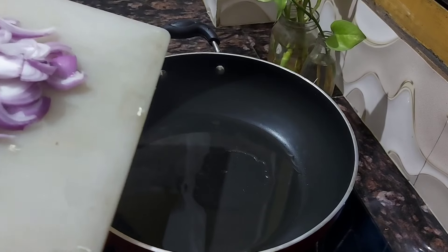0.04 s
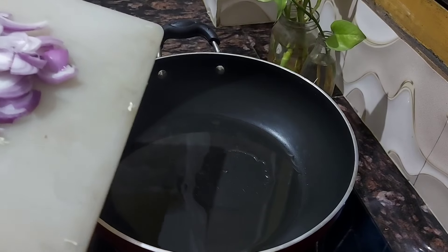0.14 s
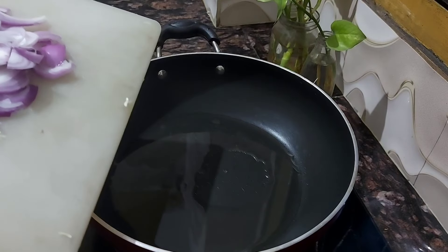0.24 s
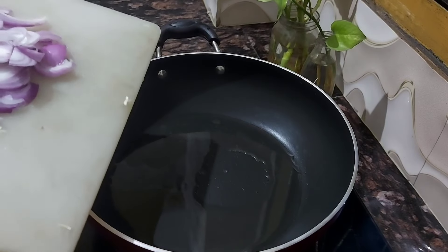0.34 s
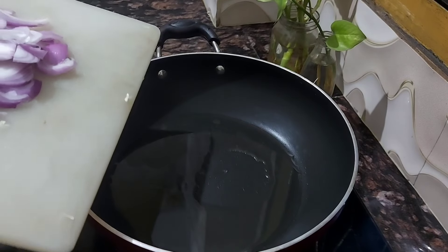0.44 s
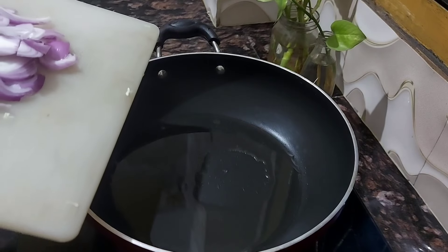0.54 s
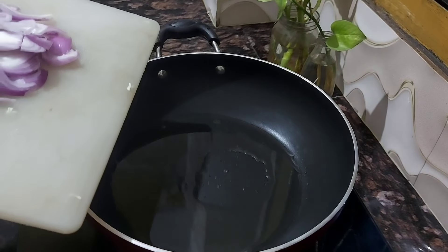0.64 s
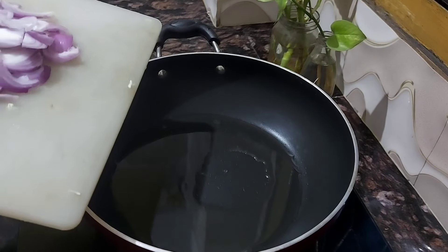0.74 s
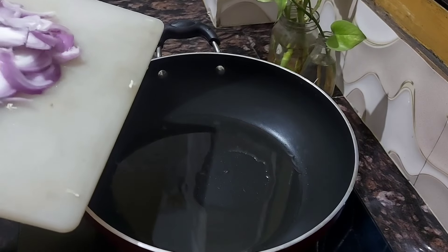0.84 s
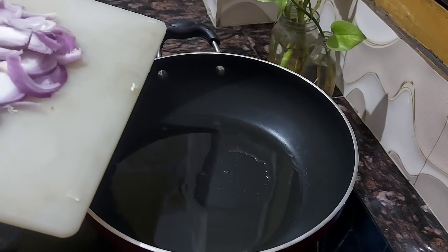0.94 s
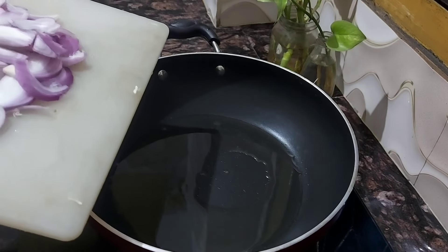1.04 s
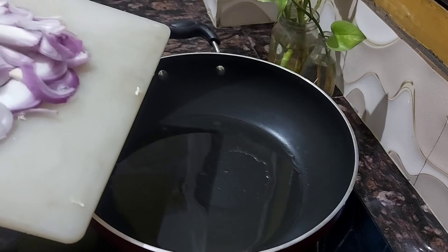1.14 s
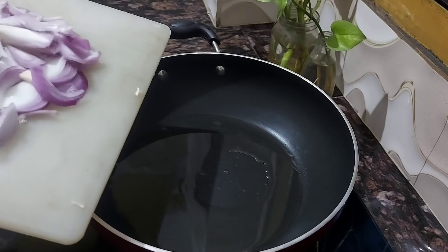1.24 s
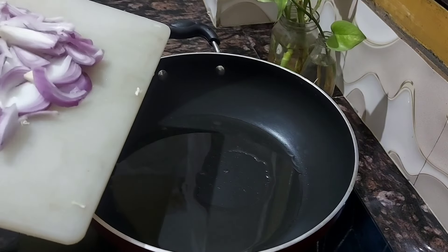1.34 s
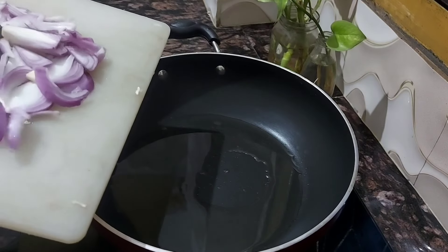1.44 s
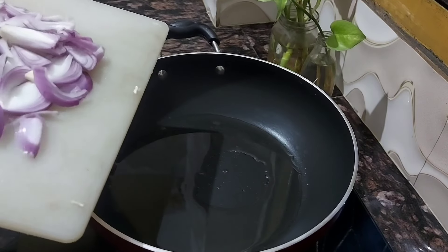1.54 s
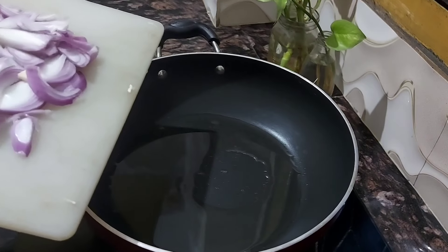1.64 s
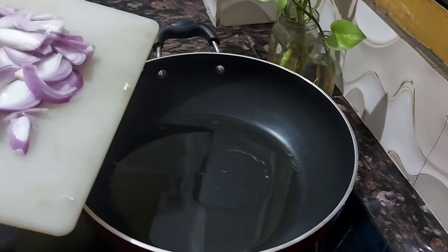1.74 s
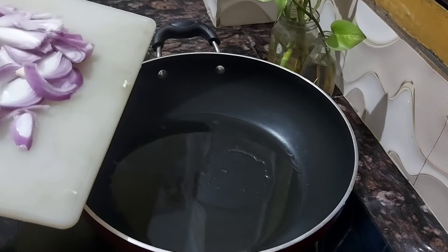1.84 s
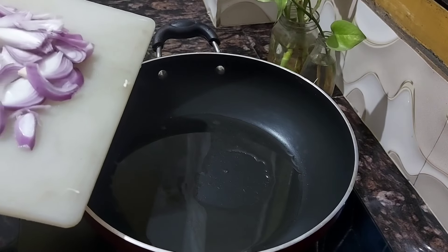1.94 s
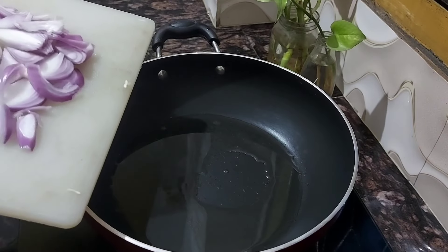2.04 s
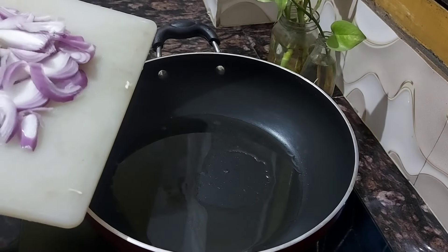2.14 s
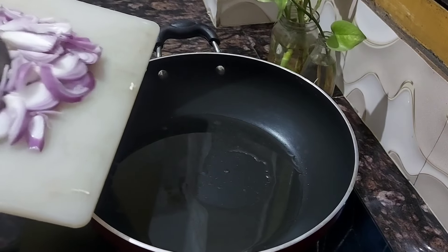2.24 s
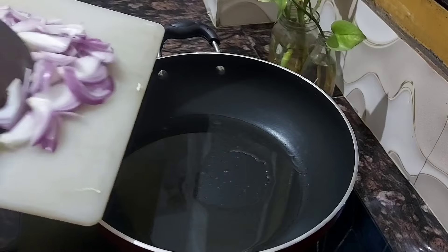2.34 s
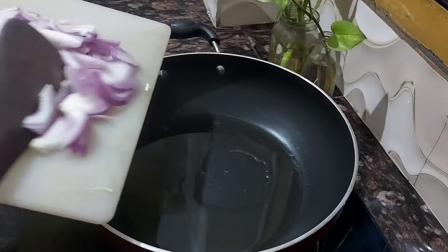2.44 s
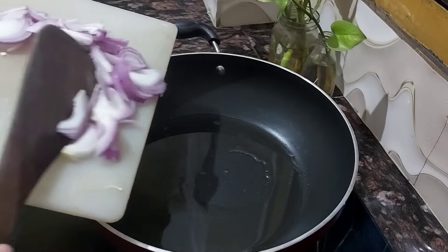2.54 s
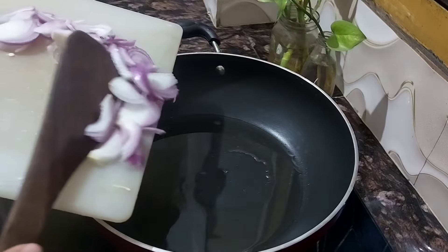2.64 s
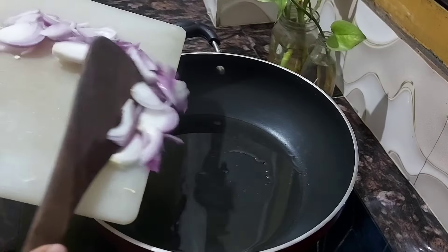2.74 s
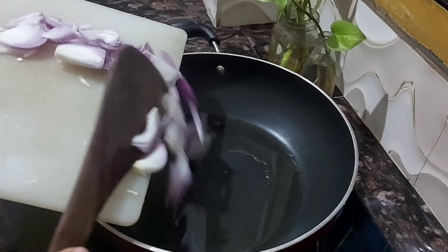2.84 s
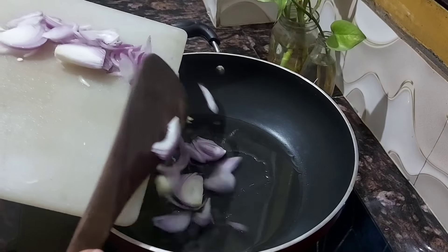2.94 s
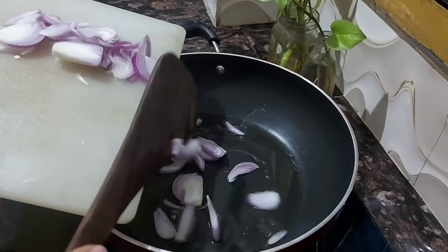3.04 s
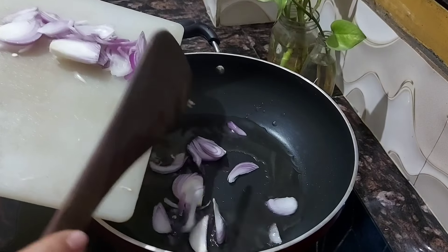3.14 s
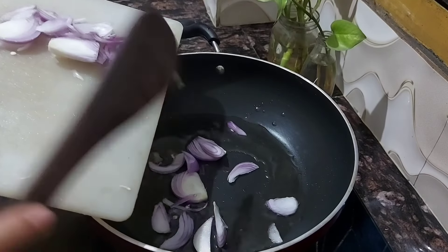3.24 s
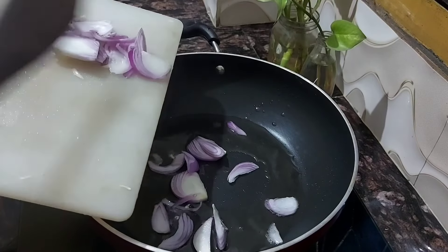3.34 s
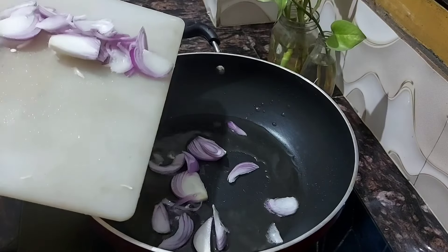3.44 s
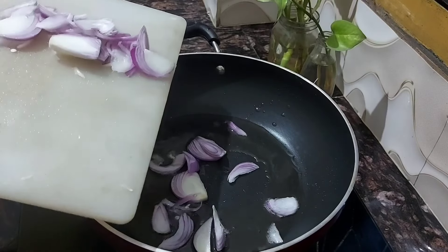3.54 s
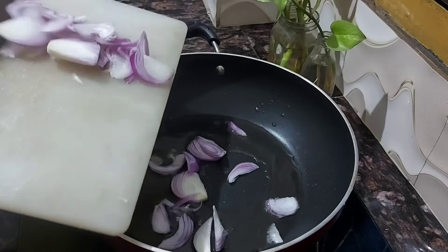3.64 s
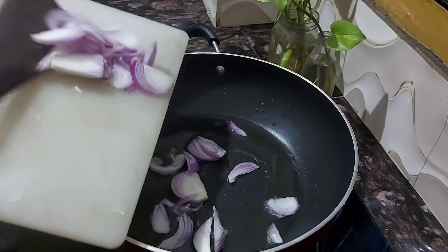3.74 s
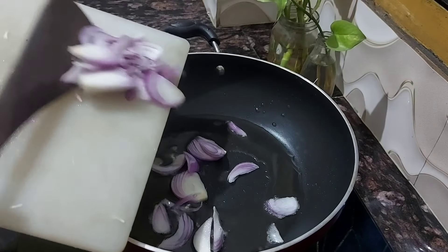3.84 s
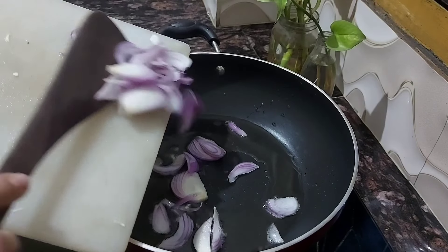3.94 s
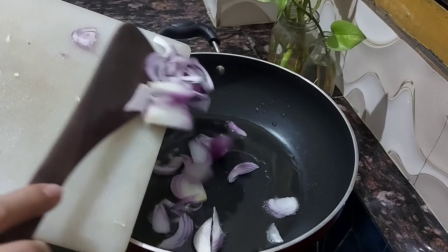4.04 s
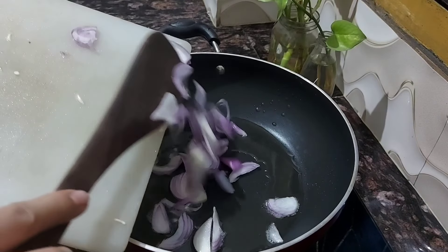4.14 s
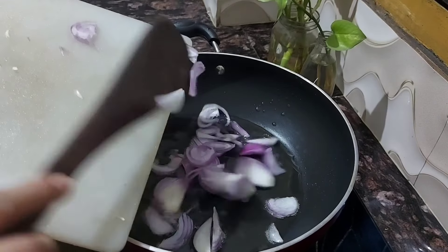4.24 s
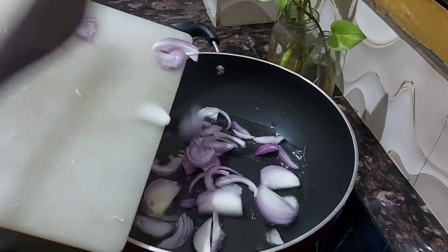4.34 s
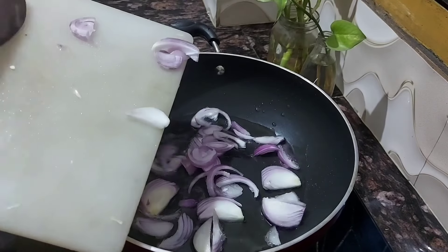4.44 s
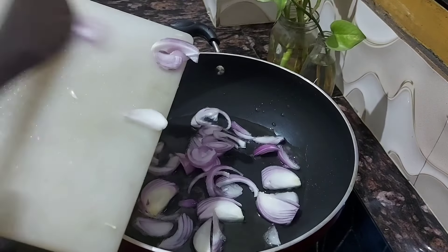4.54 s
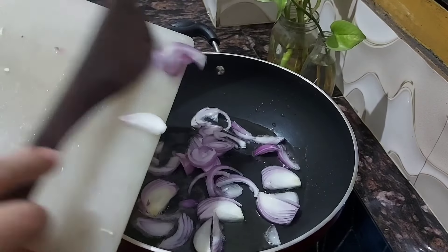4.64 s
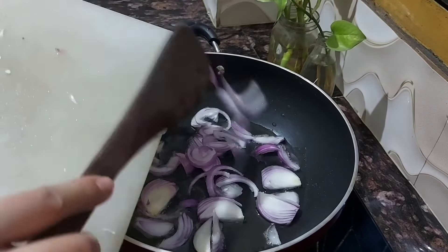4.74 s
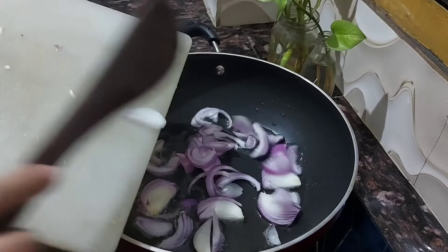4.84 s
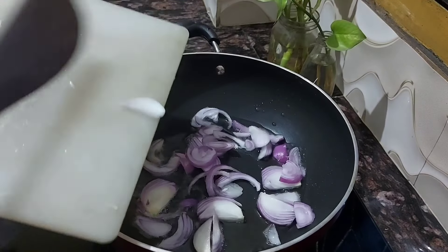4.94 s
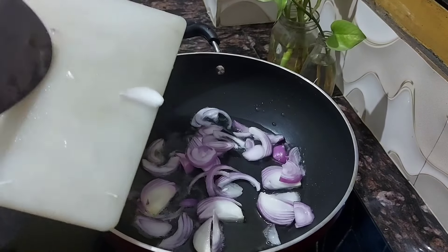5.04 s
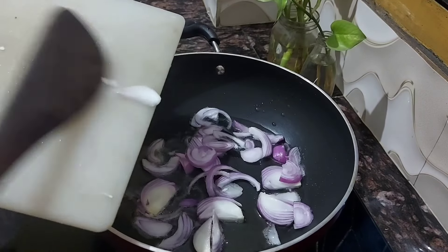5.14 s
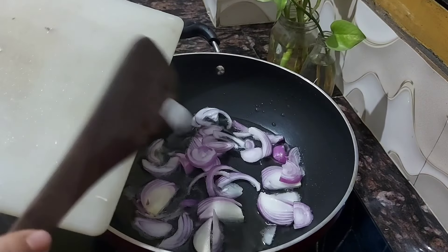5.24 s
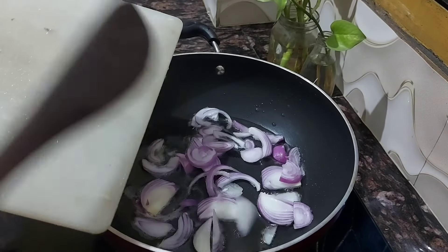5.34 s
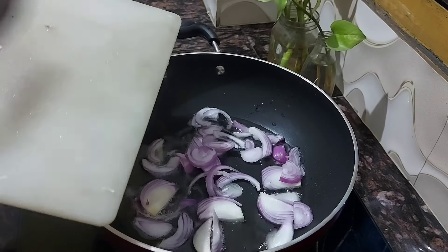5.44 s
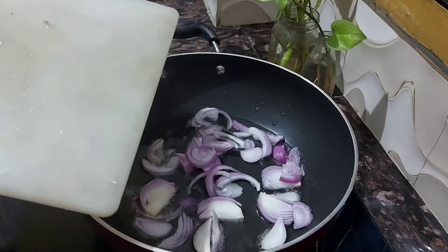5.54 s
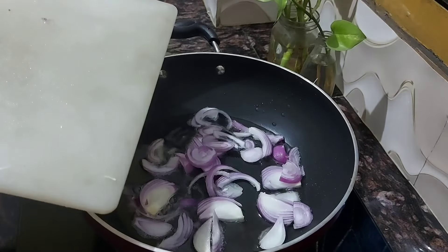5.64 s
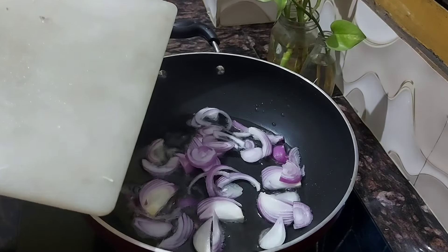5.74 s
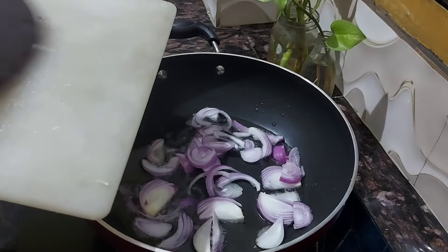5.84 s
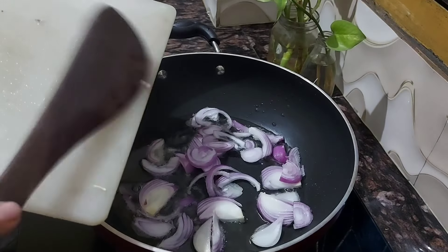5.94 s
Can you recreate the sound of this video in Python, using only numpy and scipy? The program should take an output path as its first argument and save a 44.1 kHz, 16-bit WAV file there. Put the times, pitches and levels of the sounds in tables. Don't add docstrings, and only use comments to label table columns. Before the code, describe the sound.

In a small home kitchen, faint hiss, mains buzz and low handling rumble accompany a tap and rough scrape on a plastic board. After a quiet pause and another faint push, onion slices fall into hot oil. Sizzle erupts abruptly, with crackles, foamy surges and loud late pops. A close stereo counter microphone sounds dull on top.

```python
import sys
import numpy as np
from scipy import signal
from scipy.fft import rfft, irfft, next_fast_len
from scipy.io import wavfile
from scipy.ndimage import uniform_filter1d

SR = 44100
rng = np.random.default_rng(int(sys.argv[2]) if len(sys.argv) > 2 else 0)


def volts(x):
    e = np.asarray(x, float) / 20
    return 10 ** e


def to_wav(sig):
    pcm = np.clip(np.atleast_2d(sig), -1, 1) * 32767
    pcm = np.round(pcm).astype(np.int16)
    wavfile.write(sys.argv[1], SR, pcm.T)


N = 264159

# [t/s, peak level/dB, small bubble f/Hz, its level/dB, crack level/dB]
DEEP_POPS = [
    (3.066, -27.5, 5450, 7, -1),
    (3.262, -29, 3640, 10.5, 0),
    (3.804, -53, 2920, 26, -15),
    (4.585, -27, 3030, -3, -18),
    (5.146, -10.5, 1820, -11, -13.5),
    (5.359, -19.5, 5230, 1.5, 6.5),
    (5.7931, -10, 1370, -11.5, -10.5),
    (5.9248, -12, 1140, -1, -2.5),
]


def rms_one(x):
    return x / np.sqrt(np.mean(x ** 2) + 1e-20)


def in_time(rows):
    s, *columns = np.transpose(rows)
    return [np.interp(np.arange(N) / SR, s, c) for c in columns]


def at_hz(points, hz):
    points_hz, points_db = np.transpose(points)
    return np.interp(np.log(hz), np.log(points_hz), points_db)


def drift(rate_hz):
    r = np.exp(-80 * np.pi * rate_hz / SR)
    slow = signal.lfilter([1], [1, -2 * r, r * r], rng.standard_normal(N // 40 + 2002))[2000:]
    return np.interp(np.arange(N) / 40, np.arange(len(slow)), rms_one(slow))


def resonate(x, hz, width_hz):
    r = np.exp(-np.pi * width_hz / SR)
    w = 2 * np.pi * hz / SR
    return signal.lfilter([0, np.sin(w)], [1, -2 * r * np.cos(w), r * r], x + 1e-18)


def grains(per_s, spread_db):
    shape = (2, 2, N)
    sizes = volts(spread_db * np.minimum(rng.exponential(1, shape), 5))
    signs = rng.choice([-1, 1], shape)
    struck = rng.random(shape) < per_s / SR
    return rms_one(sizes * signs * struck) + 1e-9


def banded(trains, spectrum, patchy_db, alike_more=0.0):
    # [f/Hz, correlation]
    likeness = [(60, -1.4), (210, 0.84), (750, 0.52), (2640, 0.35), (9340, 0.41)]
    out, together = 0, drift(10.0)
    low_hz, high_hz = spectrum[0][0], spectrum[-1][0]
    edges = np.geomspace(low_hz, high_hz, int(2.5 * np.log2(high_hz / low_hz)) + 2)
    for k, (low, high) in enumerate(zip(edges, edges[1:])):
        band = signal.butter(2, [low, high], "band", fs=SR, output="sos")
        mid, side = signal.sosfilt(band, trains[k % 2])
        hz = np.sqrt(low * high)
        alike = np.clip(at_hz(likeness, max(hz, 130)) + alike_more, -.99, .99)
        gain = volts(at_hz(spectrum, hz) + patchy_db * (together + drift(22.5)))
        out = out + gain * (np.sqrt(1 + alike) * mid + np.sqrt(1 - alike) * side * [[1], [-1]])
    return rms_one(out)


def swells(rows, bed_db=-120):
    t, power = np.arange(N) / SR, volts(bed_db) ** 2
    for s, db, rise, hold, fall in rows:
        climb_db = 30 * np.maximum(s - t, 0) / rise
        fall_db = fall * np.maximum(t - s - hold, 0)
        power = power + volts(db - climb_db - fall_db) ** 2
    return np.sqrt(power)


def still_kitchen():
    # [f/Hz, level/dB per Hz]
    hiss_spectrum = [(50, -11), (120, -0.5), (300, -6.5), (600, -8.5), (1300, -12.5), (3000, -15),
                     (6000, -17.5), (11000, -31)]
    # [f/Hz, level/dB per Hz]
    rumble_spectrum = [(18, 9.5), (35, -9.5), (55, -8.5), (90, -11), (160, -17.5)]
    # [f/Hz, level/dB]
    harmonics = [(102.3, -74), (247.6, -76), (301.5, -76), (349.9, -85), (452.2, -80.5), (500.6, -77),
                 (597.5, -83.5), (672.9, -87.5), (699.8, -78.5), (802.1, -85), (1001, -81), (1098, -83.5),
                 (1200, -85.5), (1249, -82.5), (1400, -88), (1599, -85.5), (1798, -89.5), (2223, -90),
                 (2299, -84), (2498, -102.5), (2826, -103), (2998, -88)]
    # [t/s, depth/dB]
    ducks = [
        (0, 7.5),
        (.635, 9.5),
    ]
    # [t/s, level/dB, hold/s, fall/dB per s]
    shifts = [
        (0, -61, 0.25, 33),
        (1.55, -75, .01, 46),
        (2.1, -49.5, .05, 10.5),
        (3.17, -48.5, 0.072, 64),
        (3.5, -57.5, 0.37, 83),
        (4.035, -55, .02, 30.5),
        (4.34, -50.5, .02, 17),
        (5.79, -58, .2, 34),
    ]
    duck_s, recover_s = 0.019, 0.075
    rise_s, counter_db = 0.22, -66
    t = np.arange(N) / SR
    hiss_db = -72.5
    for s, db in ducks:
        hiss_db = hiss_db - db * np.exp(-np.maximum((t - s) / recover_s, (s - t) / duck_s))
    hands = swells([(s, db, rise_s, hold, fall) for s, db, hold, fall in shifts], counter_db)
    hiss = banded(rng.standard_normal((2, 2, N)), hiss_spectrum, patchy_db=.15, alike_more=.3)
    mains = 2 * np.pi * 50 * t
    buzz = 0
    for hz, db in harmonics:
        buzz = buzz + volts(db + drift(1.5)) * np.sin(round(hz / 50) * mains + rng.uniform(0, 5.55))
    rumble = banded(rng.standard_normal((2, 2, N)), rumble_spectrum, patchy_db=3.5, alike_more=-0.27)
    rumble = rumble + 0.52 * np.sin(mains)
    left_leaning = buzz * volts(hiss_db + 75.5) + hands * rumble
    return volts(hiss_db + 8) * hiss + left_leaning * volts([[2.5], [-2.5]])


def board():
    # [f/Hz, level/dB per Hz]
    scrape_spectrum = [(60, 12.5), (150, 3), (450, 8.5), (900, 3), (1700, 0.5), (3000, -6), (5000, -13),
                       (11000, -39)]
    # [t/s, peak level/dB]
    tap_event = [
        (0.1225, -28),
    ]
    # [t/s, level/dB, rise/s, hold/s, fall/dB per s]
    strokes = [
        (0.12, -46, 0.0024, 0.024, 51),
        (0.198, -51, 0.16, .12, 150),
        (.42, -77, 0.056, 0.13, 300),
        (2.072, -55.5, 0.073, .09, 115),
    ]
    edge_db, edge_sag_db_per_s = 0.5, 51
    t = np.arange(N) / SR
    body, edge = swells(strokes), 0
    for row in strokes:
        edge = edge + swells([row]) * volts(edge_db - edge_sag_db_per_s * np.maximum(t - row[0], 0))
    slide = banded(grains(3500, spread_db=1.5), scrape_spectrum, patchy_db=.6, alike_more=0.12)
    low = signal.sosfilt(signal.butter(2, 1400, "low", fs=SR, output="sos"), slide)
    high = signal.sosfilt(signal.butter(2, 1400, "high", fs=SR, output="sos"), slide)
    out = volts(-1.4) * body * rms_one(low) - volts(-1.7) * edge * rms_one(high)
    s, db = tap_event[0]
    t = np.arange(300) / SR
    tap = rng.standard_normal(300) * np.exp(-t / .0011) * np.minimum(t / .001, 1)
    tap = signal.sosfilt(signal.butter(2, [400, 5500], "band", fs=SR, output="sos"), tap)
    at = round(s * SR)
    out[:, at:at + 300] += volts(db + 7.5) * tap
    return out


def pops():
    # [t/s, peak level/dB, small bubble f/Hz, its level/dB, crack level/dB]
    shallow_pops = [(3.229, -34.5, 5550, -5, 3), (3.39, -27, 4300, -1, -4), (3.457, -30.5, 4720, 6, 7.5),
                    (3.494, -23, 6000, -6, -10), (3.577, -24.5, 3740, -1, 1),
                    (3.625, -24.5, 2170, -3, -2.5), (3.6701, -14, 3025, 5, -6), (3.694, -37, 2880, 5, -7),
                    (3.891, -30, 2210, 7, -3), (4.664, -22, 1900, -9, -6), (4.734, -22, 1840, -7, -2),
                    (5.022, -29, 3970, -30, 12), (5.631, -32.5, 2170, 0, 8)]
    deep_hz, shallow_hz = 766, 1470
    out, size = np.zeros((2, N)), 1400
    t = np.arange(size) / SR
    no_thump = signal.butter(2, 450, "high", fs=SR, output="sos")
    rows = [(*pop, deep_hz) for pop in DEEP_POPS] + [(*pop, shallow_hz) for pop in shallow_pops]
    for s, db, small_hz, small_db, crack_db, big_hz in sorted(rows):
        swell = np.minimum(t / .0017, 1) ** 2
        big = np.sin(2 * np.pi * big_hz * t) * np.exp(-t / 0.0021)
        small = volts(small_db) * np.sin(2 * np.pi * small_hz * t) * np.exp(-t / 0.0019 + .5)
        common, own = rng.standard_normal(size), rng.standard_normal((2, size))
        late = np.maximum(t - .0005, 0)
        snap = np.sin(2 * np.pi * (500 * late + 3e6 * late ** 2))
        snap = snap * (.4 + late / .001) * np.exp(-(late / .0013) ** 4)
        spray = .5 * (common + .4 * own) * np.exp(-t / .0012)
        at = round(s * SR)
        burst = volts(db) * (swell * (big + small) + volts(crack_db) * (snap + swell * spray))
        out[:, at:at + size] += signal.sosfilt(no_thump, burst)[:, :N - at]
    return out


def kitchen(x):
    t60_s, wall_cut_hz = 0.65, 5900
    size = next_fast_len(N + SR)
    w = 2 * np.pi * np.arange(size // 2 + 1) / size
    dull = 1 / (1 + 1j * w * SR / (2 * np.pi * wall_cut_hz))
    walls = np.zeros((2, len(w)), complex)
    for k, lag_s in enumerate(rng.uniform(.009, 0.031, 16)):
        loop = volts(-60 * lag_s / t60_s) * dull ** 0.2 * np.exp(-1j * w * round(lag_s * SR))
        walls[k % 2] += (-1) ** (k // 2) * loop / (1 - loop)
    return irfft(rfft(x, size) * walls, size)[:, :N]


def vigour():
    # [t/s, fizz level/dB, foam level/dB]
    boil = [(3.068, -61.5, -61), (3.2, -47, -48.5), (3.3, -45.5, -47.5), (3.4, -38.5, -49.5),
            (3.48, -38.5, -49.5), (3.59, -46.5, -57), (3.67, -42, -56), (3.74, -42, -49), (3.82, -39, -41),
            (3.95, -44, -49.5), (4.02, -40.5, -45.5), (4.28, -42.5, -48.5), (4.42, -41, -45.5),
            (5.06, -40, -49.5), (5.3, -42.5, -42), (5.55, -38.5, -51), (5.66, -42, -55.5), (5.99, -43, -57)]
    # [t/s, foam level/dB, churn level/dB, hold/s, fall/dB per s]
    surges = [(3.076, -43, -45, .01, 79), (3.25, -47, -64, 0.015, 150), (3.798, -40.5, -46.5, 0.023, 205),
              (3.902, -44.5, -51, 0.009, 120), (4.304, -47, -40.5, 0.07, 402), (4.588, -42, -42, .005, 209),
              (4.662, -37, -41, 0.036, 105), (4.713, -37.5, -59, 0.052, 111),
              (4.778, -37.5, -42, 0.039, 63), (5.143, -36, -40, 0.026, 79),
              (5.275, -40.5, -43.5, 0.088, 115), (5.797, -36, -40.5, 0.023, 32),
              (5.929, -36, -44, .05, 302)]
    # [t/s, level/dB, fall/dB per s]
    spits = [(3.07, -45, 100), (3.265, -46, 196), (3.626, -41, 65), (3.7, -44.5, 103), (4.19, -43.5, 100),
             (4.3, -39.5, 152), (4.369, -40.5, 400), (4.46, -39, 43), (5.128, -37.5, 504),
             (5.29, -38.5, 95), (5.362, -39.5, 102), (5.61, -39, 209), (5.799, -39, 26.5)]
    # [t/s, level/dB, fall/dB per s]
    wall_hits = [(3.066, -25, 897), (3.08, -44, 57), (3.47, -44, 42), (3.583, -40, 904), (3.632, -35, 405),
                 (3.677, -31, 600), (3.735, -38, 252), (3.805, -40.5, 150), (3.851, -32.5, 352),
                 (3.9, -41.5, 146), (4.3, -44, 30), (4.378, -38, 500), (4.79, -37, 104), (5.147, -30, 900),
                 (5.801, -46, 61), (5.931, -39, 554), (5.971, -36, 700)]
    surge_rise_s, spit_rise_s, wall_rise_s = .005, .011, .01
    splash_db, splash_fall_db_per_s = 3, 600
    fizz_db, foam_db = in_time(boil)
    churn_db = -50 + 0.69 * (foam_db + 50)
    foam, churn = [], []
    for s, db, surge_churn_db, hold, fall in surges:
        foam.append((s, db, surge_rise_s, hold, fall))
        foam.append((s, db + splash_db, surge_rise_s, 0, splash_fall_db_per_s))
        churn.append((s, surge_churn_db, surge_rise_s, hold, fall))
    spray = [(s, db, spit_rise_s, 0, fall) for s, db, fall in spits]
    wall = [(s, db, wall_rise_s, 0, fall) for s, db, fall in wall_hits]
    return swells(spray, fizz_db), swells(foam, foam_db), swells(churn, churn_db), swells(wall, fizz_db - 8)


def sizzle():
    # [f/Hz, level/dB per Hz]
    fizz_spectrum = [(450, -31), (800, 5.5), (1100, -34), (1600, 1), (2200, -0.5), (3500, 1), (6000, 2.5),
                     (11000, -3)]
    # [f/Hz, level/dB per Hz]
    foam_spectrum = [(250, -30.5), (400, -9), (650, -1), (1000, -3), (1600, -4), (2300, -7.5), (3500, -17),
                     (6000, -48)]
    # [f/Hz, level/dB per Hz]
    churn_spectrum = [(25, -15.5), (60, -7.5), (130, -9.5), (310, -0.5), (450, -1), (800, -42.5)]
    fizzing, foaming, churning, ringing = vigour()
    fizz = banded(grains(5000, spread_db=2.0), fizz_spectrum, patchy_db=1.17)
    foam = banded(grains(3500, spread_db=2.5), foam_spectrum, patchy_db=.8)
    churn = banded(grains(900, spread_db=4.0), churn_spectrum, patchy_db=-0.7)
    taps = rng.standard_normal(N) + 0.43 * rng.standard_normal((2, N))
    wall = rms_one(resonate(resonate(taps, 1450, 74), 1380, 200))
    bubbles = volts(4.0) * fizzing * fizz + volts(0.5) * foaming * foam
    return bubbles + volts(-3.93) * churning * churn + volts(-4.5) * ringing * wall


def pockets():
    # [t/s, length/s, f/Hz, width/Hz, level/dB]
    jets = [(3.076, 0.15, 843, 13.7, -32.5), (3.063, 0.14, 1473, 37, -38.5),
            (3.052, 0.24, 5900, 1200, -42.5), (3.261, 0.034, 3620, 170, -39),
            (3.304, 0.18, 3600, 200, -45.5), (3.38, 0.045, 4700, 890, -34.5),
            (3.463, 0.047, 5660, 580, -38), (3.676, 0.049, 2990, 90, -43), (3.696, 0.1, 2400, 300, -40),
            (3.812, 0.11, 323, 20, -42.5), (4.3, 0.16, 156, 74, -45), (4.711, 0.15, 321, 20, -43.5),
            (4.721, 0.09, 2720, 1000, -40), (4.937, 0.019, 1340, 120, -39.5), (5.15, 0.11, 680, 140, -39.5),
            (5.2, 0.29, 314, 29, -48.5), (5.62, 0.14, 1367, 37, -48), (5.796, 0.036, 1900, 324, -31.5),
            (5.962, 0.022, 1290, 216, -32), (5.798, 0.059, 830, 170, -38.5),
            (4.759, 0.057, 1550, 500, -34.5)]
    out, t = np.zeros((2, N)), np.arange(12000) / SR
    for s, length_s, hz, width_hz, db in jets:
        jet = rng.standard_normal(16000) + 0.4 * rng.standard_normal((2, 16000))
        song = resonate(resonate(jet, hz, width_hz), hz, 3 * width_hz)[:, 4000:]
        loudness = uniform_filter1d(np.mean(song ** 2, axis=0), size=500)
        song = rms_one(song / (loudness + .05 * loudness.mean()) ** .3)
        shape = np.clip(t / 0.0015, 0, 1) * np.exp(-.7 * t / length_s) / (1 + (t / length_s) ** 7)
        at = round(s * SR)
        out[:, at:at + len(t)] += (volts(db) * shape * song)[:, :N - at]
    return out


def scene():
    bursts = pops()
    echo = volts(-14) * kitchen(bursts.mean(axis=0))
    landed = np.arange(N) > DEEP_POPS[0][0] * SR
    fry = landed * (sizzle() + pockets())
    return still_kitchen() + board() + bursts + echo + fry


def roll_off(x):
    return signal.sosfilt(signal.butter(12, 9940, fs=SR, output="sos"), x)


def record(dry):
    # [f/Hz, gain/dB]
    response = [(5000, 0.5), (6300, -3), (7200, -8.5), (8000, -19), (9000, -21), (9800, -35),
                (10100, -55.5), (11000, -64)]
    # [f/Hz, left-right gain/dB]
    capsules = [(60, -3), (160, 5), (450, 3.5), (1240, 2), (3400, -0.5), (9340, -4.5)]
    # [t/s, offset/thousandths of full scale]
    pressure = [(0, 57), (0.06, 40), (0.14, 70), (0.2, 54), (0.27, 100), (0.35, 103), (0.43, 80), (0.5, 20),
                (0.63, 4), (1, 8.8), (1.3, 5.8), (1.95, 5.2), (2.1, 1.7), (5.98, 1.6)]
    size = next_fast_len(N)
    hz = np.maximum(np.arange(size // 2 + 1) * SR / size, 1)
    colour_db = at_hz(response, hz) + [[.5], [-.5]] * at_hz(capsules, hz)
    x = irfft(rfft(dry, size) * volts(colour_db), size)[:, :N]
    left = in_time(pressure)[0]
    both = np.array([left, 0.78 * left ** 0.81])
    offset = uniform_filter1d(both, size=2600, axis=1, mode="nearest") / 1000
    return roll_off(x + offset)


dry = scene()
out = record(dry)
to_wav(out)
```